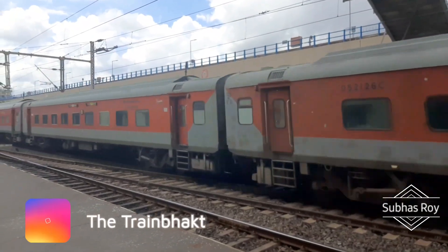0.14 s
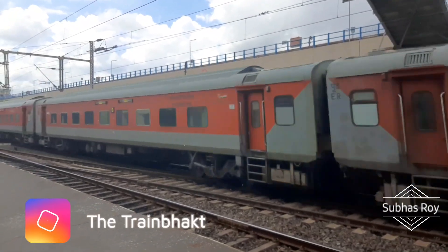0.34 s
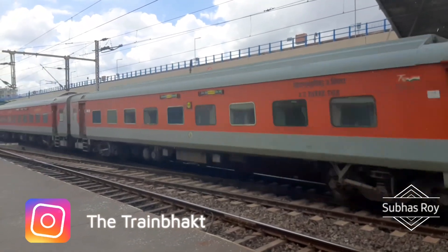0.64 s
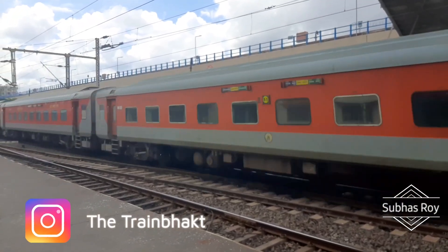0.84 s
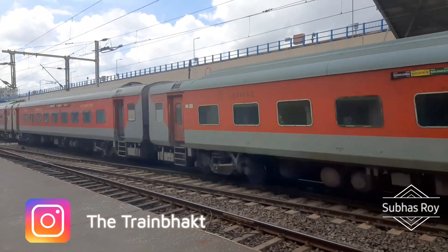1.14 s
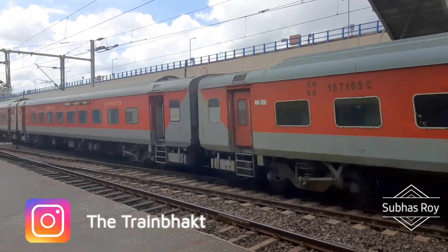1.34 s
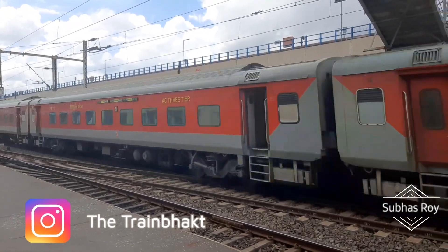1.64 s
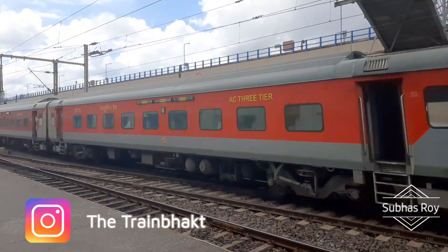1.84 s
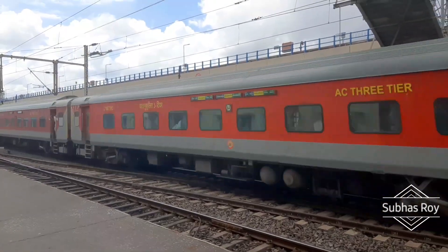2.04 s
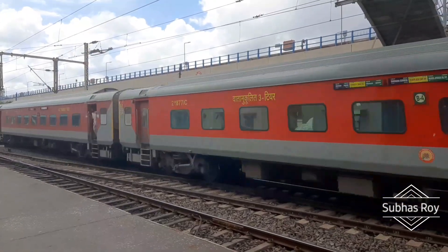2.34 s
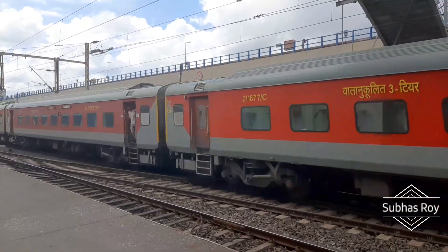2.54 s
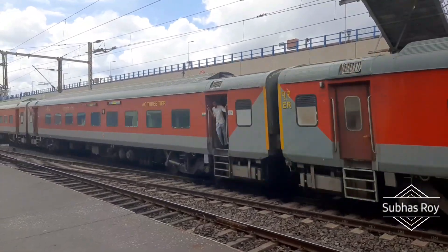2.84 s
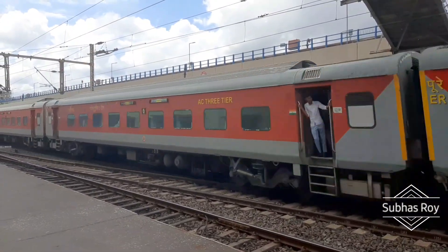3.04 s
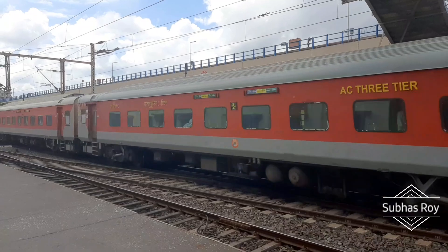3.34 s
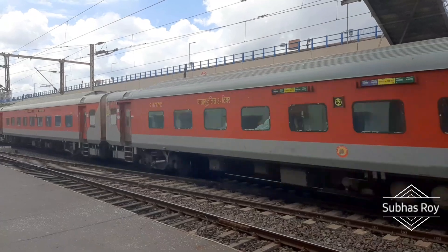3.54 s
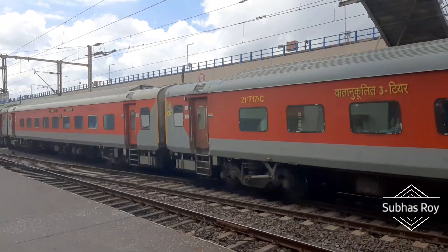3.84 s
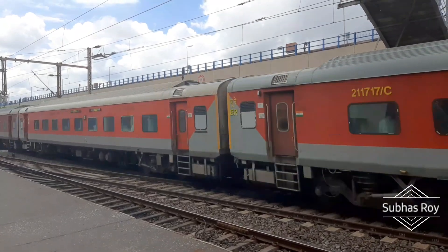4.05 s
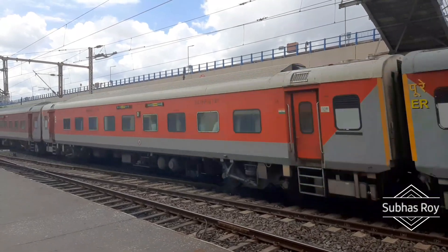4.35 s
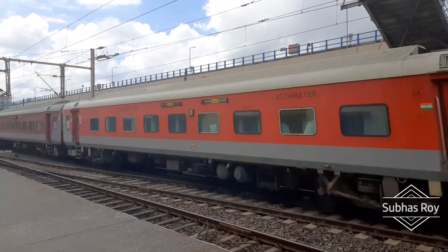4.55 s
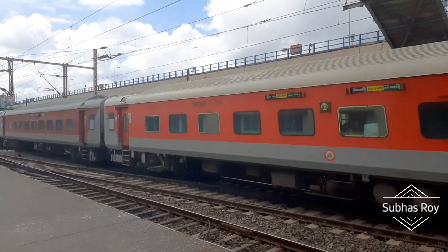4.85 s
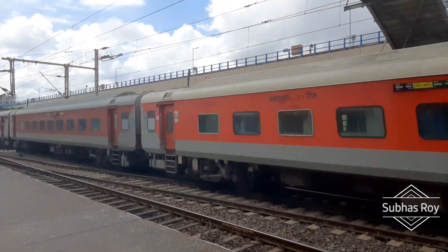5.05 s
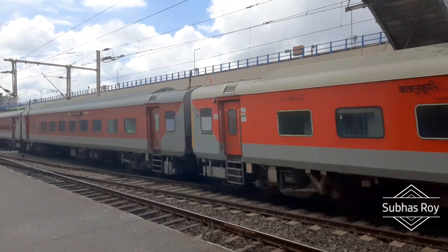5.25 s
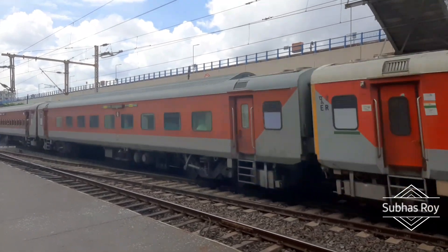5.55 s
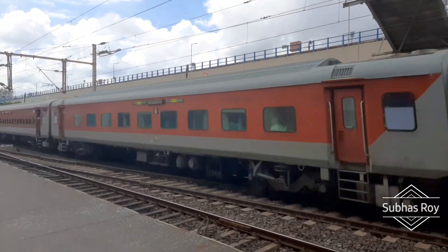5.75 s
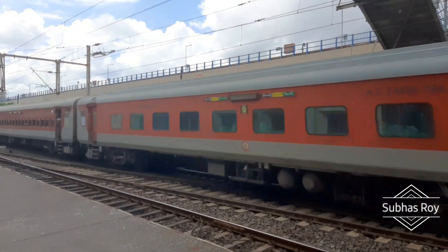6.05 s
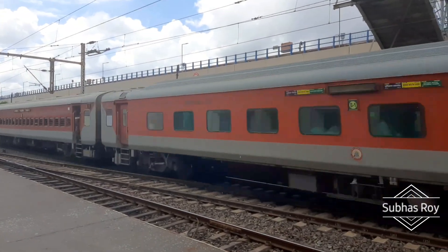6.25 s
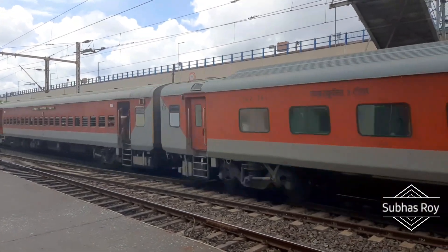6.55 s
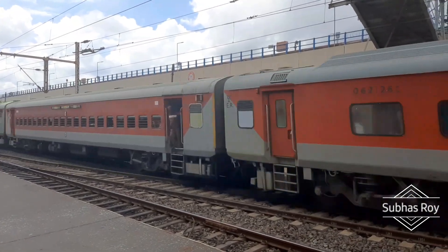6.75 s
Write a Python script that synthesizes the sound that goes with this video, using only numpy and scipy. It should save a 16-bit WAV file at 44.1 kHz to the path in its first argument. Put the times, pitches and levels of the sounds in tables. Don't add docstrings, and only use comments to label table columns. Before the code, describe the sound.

Coach after coach clatters by at moderate speed, steel wheels banging over track gaps, with rumbling rails, faint wheel singing and thin hiss.

```python
import sys
import numpy as np
from scipy import signal
from scipy.fft import rfft, irfft, next_fast_len
from scipy.io import wavfile
from scipy.ndimage import uniform_filter1d, minimum_filter1d, map_coordinates

SR = 44100
rng = np.random.default_rng(int(sys.argv[2]) if len(sys.argv) > 2 else 0)


def boost(x):
    u = np.asarray(x, float) / 20
    return 10 ** u


def unload_audio(sound):
    columns = np.transpose(np.atleast_2d(sound))
    steps = np.round(np.clip(columns, -1, 1) * 32767)
    wavfile.write(sys.argv[1], SR, steps.astype(np.int16))


N = 303849

SPEED_M_S, SLOWING_M_S2 = 18.9, 0.16
WHEELBASE_M, STRETCH_M = 2.56, 3.8


def along(points, hz):
    f, v = np.transpose(points)
    return np.interp(np.log(hz + 1), np.log(f + 1), v)


def curves(rows):
    s, *columns = np.transpose(rows)
    return [np.interp(np.arange(N) / SR, s, column) for column in columns]


def unit(x):
    return x / np.sqrt(np.mean(x ** 2) + 1e-20)


def wobble(rate, count=N):
    knots = rng.standard_normal(int(count * 100 / SR) + 4)
    return map_coordinates(knots, [np.arange(count) * min(rate, 99) / SR])


def filtered(x, response):
    m = next_fast_len(N + SR // 2)
    return irfft(rfft(x, m) * response(np.fft.rfftfreq(m, 1 / SR)), m)[..., :N]


def modes(table):
    def response(f):
        total = 0
        for k, (centre, width, db) in enumerate(table):
            damping = 1j * f * width
            total = total + (-1) ** k * boost(db) * damping / (centre * centre - f * f + damping)
        return total
    return response


def colour(spectrum):
    return lambda f: boost(along(spectrum, f))


def rush(patchy_db):
    # frequency in Hz, likeness of left and right (correlation).
    coherence = [(60, 1.2), (130, 1), (290, 0.83), (640, 0.79), (1410, 0.12), (3100, 0.11), (6820, 0.15),
                 (15000, 0.62)]
    z = signal.stft(rng.standard_normal((2, N)), nperseg=512)[2]
    patches = uniform_filter1d(rng.standard_normal(z.shape[1:]), size=2, axis=0)
    patches = uniform_filter1d(patches, size=7, axis=1)
    pair = signal.istft(z * boost(patchy_db * unit(patches)), nperseg=512)[1][:, :N]

    def mid_side(hz):
        angle = np.arccos(np.clip(along(coherence, hz), -1, 1)) / 2
        return np.array([np.cos(angle), np.sin(angle)])

    mid, side = filtered(pair, mid_side)
    return np.array([mid + side, mid - side])


def speed(s):
    return SPEED_M_S - SLOWING_M_S2 * s


def passing(column, rise, fall, alone_db, last_db, after_db, fading_db, floor_db, heave_db):
    # arrival in seconds, then levels in dB of track boom, rail roar, wheel roar and gear hiss.
    bogies = [(-.125, -8.5, -17.5, -26.5, -37.5), (.3606, -11, -20.5, -27.5, -41.5),
              (1.154, -12.5, -21, -27, -42), (1.642, -12, -22, -29, -44.5),
              (2.4435, -12, -20.5, -28.5, -47), (2.943, -11, -20, -25, -43), (3.7485, -11, -19, -25, -42),
              (4.249, -13, -20, -26.5, -40), (5.0734, -13.5, -21.5, -26, -35),
              (5.5814, -11.5, -20.5, -28, -43.5), (6.415, -13.5, -21.5, -27, -40.5)]
    # distance in m, length in seconds, dB over the
    swells = [
        (4.25, 0.011, -2),
        (9.1, 0.03, -8.5),
        (11.6, 0.029, -9),
        (14.1, .035, -10),
    ]
    shield_db = -2
    t, power = np.arange(0, N, 64) / SR, boost(2 * floor_db)

    def step(u, width):
        return 1 / (1 + np.exp(-np.clip(4 * u / abs(width), -50, 50)))

    for k, row in enumerate(bogies):
        u, pace = t - row[0], speed(row[0])
        axle_gap_s = WHEELBASE_M / pace
        left = u - (WHEELBASE_M + STRETCH_M) / pace
        first_axle = boost(2 * alone_db) * np.clip(u / abs(rise), 0, 1) ** 2
        on = first_axle + (1 - boost(2 * min(alone_db, 0))) * step(u - axle_gap_s, rise)
        on = on * boost(2 * last_db * step(left + axle_gap_s / 2, axle_gap_s))
        glow_db = after_db + shield_db * (1 - k % 2) - fading_db * np.maximum(left, 0)
        off = 1 - step(left, fall) * (1 - boost(2 * glow_db))
        heave = sum(boost(2 * (db + heave_db)) * np.exp(-((u - m / pace) / length) ** 2)
                    for m, length, db in swells)
        power = power + boost(2 * row[column]) * (on * (u > 0) * off + heave)
    return np.interp(np.arange(N) / SR, t, 10 * np.log10(power))


def track():
    # resonance in Hz, width in Hz, level in dB; rail on sleepers, upper rail, then ground and coaches.
    sleeper_modes = [(204.4, 21.5, -8.5), (242.3, 18.8, 0.5), (277.6, 21.6, 0), (306, 30.5, -2),
                     (367, 37, -5), (408, 79, -14.5)]
    rail_modes = [(456, 89, -5), (558, 107, -4), (628.7, 36, 1), (708, 99, -3.5), (802.5, 144, -5),
                  (1077, 183, -14), (1247, 200, -14.5)]
    ground_modes = [(81.7, 25, -6), (103.4, 12.5, -1), (135.2, 24.5, -0.5), (164.6, 13.6, -4.5),
                    (178.8, 13.5, -6)]
    # frequency in Hz, level in dB per Hz.
    yard_spectrum = [(25, -4), (50, 3), (75, 11), (110, -5), (160, 2), (260, -16), (500, -36), (900, -44),
                     (2000, -120)]
    # rise and fall in seconds, leading and trailing axle alone in dB, afterglow in dB,
    # its fading in dB per second, floor in dB, heave in dB.
    boom_load = (.06, .1, -1.5, -2.5, -14, 12, -28, -5)
    rail_load = (0.21, 0.08, -0.5, 0.44, -8, 10.5, -30, -10)
    ground_load = (0.2, 0, -2, -1, -15, 40, -26, .5)
    boom_db, rail_db = passing(1, *boom_load), passing(2, *rail_load)
    slow_db = uniform_filter1d(boom_db, size=SR // 8)
    near = np.clip((slow_db + 33.0) / 10, 0, 1)
    jolts = near * wobble(35)
    boom = unit(filtered(boost(0.27 * jolts) * rush(patchy_db=0.5), modes(sleeper_modes)))
    rail_jolts = boost(1.8 * jolts + 1.33 * near * wobble(50))
    rail = unit(filtered(rail_jolts * rush(patchy_db=1.2), modes(rail_modes)))
    shaking = unit(filtered(rush(patchy_db=0.35), modes(ground_modes)))
    ground = boost(passing(1, *ground_load) - 4.5) * shaking
    distant = rng.standard_normal(N) + 0.55 * rng.standard_normal((2, N))
    yard = boost(-27.5) * unit(filtered(distant, colour(yard_spectrum)))
    return boost(boom_db - 2.5) * boom + boost(rail_db) * rail + ground + yard


def contacts():
    # time in seconds, clang in dB, bright share in dB, thump in dB.
    axles = [(-.125, -13, -25, 0), (.017, -12, -12, -8), (.3606, -11, -19, 0), (.4933, -13.5, -26, -1),
             (1.154, -12.5, -23, -1.5), (1.2866, -13, -29, 0.5), (1.642, -12.5, -22, -1.5),
             (1.779, -15.5, -25, -0.5), (2.4435, -10.5, -16, -5), (2.576, -12.5, -39, -1.5),
             (2.943, -13, -30, 2), (3.075, -17, -30, -5.5), (3.7485, -8.5, -30, -0.5),
             (3.893, -12.5, -30, 0.5), (4.249, -10.5, -19, -1), (4.386, -14, -21, -6),
             (5.0734, -9.5, -26, -4.5), (5.215, -12, -11, 0), (5.5814, -11.5, -17, -2),
             (5.723, -14.5, -28, -4), (6.415, -10.5, -20, -4.5), (6.565, -12, -25, 1.5)]
    # distance in m, clang in dB, thump in dB, rattle length in seconds, ping in dB.
    gaps = [
        [(0, 0.3, -4, 0.043, -1.1), (.92, -16, -3, .03, -6), (1.92, -8.5, -0.5, .04, 7),
         (2.9, -12, 0.5, 0.027, -8)],
        [(0, 1.6, -2.5, 0.04, -8), (.95, -16, -1, .04, -8), (1.8, -27, -0.5, 0.045, -8),
         (2.82, -5, 0, 0.067, -10)],
    ]
    # time in seconds, clang in dB, thump in dB, pitch in Hz.
    stray_blows = [(.245, -21, -20, 300), (.3, -20, -20, 290), (0.752, -19.5, -32, 250),
                   (.974, -17.5, -11, 250), (1.37, -14.5, -25, 268), (2.052, -28, -7, 261),
                   (2.098, -38, -30, 263), (2.193, -30, -10, 262), (2.267, -32, -9.5, 273),
                   (2.85, -25, -13, 268), (3.651, -29, -16, 270), (6.081, -24, -30, 260),
                   (.557, -30, -7, 283), (1.257, -16, -2, 293), (1.705, -20.5, -12, 290),
                   (2.155, -23, -20, 270), (2.695, -17, -10, 280), (1.956, -27, -5, 250),
                   (2.673, -22, -8, 290), (3.014, -38, -1.5, 282), (3.871, -12, -3, 289),
                   (4.483, -32, -1, 317), (4.546, -20, -6, 310), (5.1, -24, -7, 289), (5.6, -39, -5, 268),
                   (5.161, -23, -0.5, 272), (5.839, -27, -16, 281), (6.717, -30, -13, 264)]
    bounce_hz, spread_hz, scatter_db = 293, 13.4, -1.3
    sag_hz_per_m = 4.6
    luck = rng.uniform(-1.17, 1, (len(axles), len(gaps[0]), 3))
    rows = []
    for k, (s, clang_db, bright_db, thump_db) in enumerate(axles):
        for (m, gap_db, slam_db, length, ping_db), (a, b, c) in zip(gaps[k % 2], luck[k]):
            hz = bounce_hz - sag_hz_per_m * (m + WHEELBASE_M * (k % 2)) + spread_hz * c
            slam = thump_db + slam_db + scatter_db * b
            blow = clang_db + gap_db + scatter_db * a * (m > 0)
            rows.append((s + m / speed(s), slam, hz, blow, bright_db, length, ping_db))
    for s, clang_db, thump_db, hz in stray_blows:
        rows.append((s, thump_db, hz, clang_db, -26, 0.039, -4))
    return [row for row in rows if 0 <= row[0] < N / SR]


def blows(hits):
    out, t = np.zeros((4, N + SR)), np.arange(SR // 3) / SR
    for s, _, _, db, bright_db, length, ping_db in hits:
        held = (1 - np.exp(-t / 0.0024)) / (1 + (t / max(length, 0.005)) ** 4)
        tail = boost(-7.0 - 60 * t / 0.22) * (1 - np.exp(-t / 0.0046))
        shape = held + tail
        ping = boost(ping_db) * (1 - np.exp(-t / 0.0022)) / (1 + (t / 0.014) ** 4)
        tyre = (t / 0.03) ** 2 * np.exp(2 - 2 * t / 0.029)
        parts = np.array([shape, boost(bright_db) * shape, ping, tyre])
        out[:, round(s * SR):][:, :len(t)] += (boost(db - 12.0) * parts) ** 2
    return np.sqrt(out[:, :N])


def wheels(hits):
    # resonance in Hz, width in Hz, level in dB.
    disc_modes = [(1642, 115, 1), (1848, 51, 4.5), (2370, 130, 3.5), (2863, 160, -1), (3515, 215, 0),
                  (4030, 112, 1), (4350, 83, -6), (6460, 17, -7), (6700, 23, -11.5)]
    # frequency in Hz, level in dB per Hz.
    roar_spectrum = [(590, -52), (1000, -5), (1270, -4.5), (1430, -14.5), (1870, -3), (2370, -6.5),
                     (3180, -11), (4080, -11), (5150, -15), (6910, -16), (8400, -28.5), (10900, -82),
                     (18500, -120)]
    clang_spectrum = [(290, -14), (500, 3), (641, 4.5), (811, 1), (1300, -5.5), (2610, -7.5), (2840, -7),
                      (4240, -14), (8400, -19.5), (10900, -79), (18500, -120)]
    hiss_spectrum = [(4710, -4), (8000, 2), (8700, -15), (9710, -1), (12300, 1), (15700, -12)]
    # rise and fall in seconds, leading and trailing axle alone in dB, afterglow in dB,
    # its fading in dB per second, floor in dB, heave in dB.
    roar_load = (0.36, .06, -9, -0.37, -3.5, 21, -39, -24)
    hiss_load = (-0.05, 0.08, -7, 0.4, -1.5, 35, -62, -12)
    ping_modes = modes([(3430, 470, -5.0), (4020, 530, 3.5), (4530, 600, -2.0)])
    tyre_modes = modes([(2400, 290, 0), (2710, 120, -12.5)])
    roar_db, hiss_db = passing(3, *roar_load), passing(4, *hiss_load)
    dull, bright, ping, tyre = blows(hits)
    rattle = boost(1.6 * wobble(45))
    roar = boost(roar_db) * rattle * unit(filtered(rush(patchy_db=4.0), colour(roar_spectrum)))
    clang = dull * unit(filtered(rush(patchy_db=2.4), colour(clang_spectrum)))
    clang += boost(-4.0) * ping * unit(filtered(rush(patchy_db=2.5), ping_modes))
    clang += boost(-7.5) * tyre * unit(filtered(rush(patchy_db=-0.5), tyre_modes))
    drive = np.hypot(boost(roar_db), 0.49 * dull) * rush(patchy_db=1)
    ring = sum(filtered(boost(2.7 * wobble(16)) * drive, modes([mode])) for mode in disc_modes)
    hiss_level = np.hypot(boost(hiss_db + 3.0), 0.99 * bright) * boost(1.3 * wobble(22.07))
    hiss = hiss_level * unit(filtered(rush(patchy_db=6.0), colour(hiss_spectrum)))
    return roar + clang + boost(8) * ring, hiss


def thumps(hits):
    out, t = np.zeros(N + SR), np.arange(SR // 10) / SR

    def swell(rise):
        return t / rise * np.exp(1 - t / rise)

    for (s, db, hz, *_), (turn, bend) in zip(hits, rng.random((120, 2))):
        bounce = swell(0.0069) * np.sin(2 * np.pi * (hz * t + turn))
        knock = boost(-10) * swell(0.0076) * np.sin(2 * np.pi * ((345 + 120 * bend) * t + bend))
        out[max(round((s - 0.004) * SR), 0):][:len(t)] += boost(db - 7.5) * (bounce + knock)
    return out[:N] * np.ones((2, 1))


def songs():
    # start in seconds, length in seconds, first pitch in Hz, level in dB.
    singing = [(.45, 0.44, 3660, -54), (1.153, 0.043, 3450, -29), (4.63, 0.21, 3660, -38),
               (1.343, 0.13, 1950, -40), (1.486, 0.27, 2965, -38), (1.648, 0.87, 2400, -41),
               (1.996, 0.2, 4000, -42), (2.051, 0.26, 4600, -50), (2.455, 0.048, 2370, -26),
               (2.55, 0.043, 2375, -26), (2.856, 0.032, 1330, -28), (2.948, 0.47, 2385, -37),
               (3.25, 0.2, 3570, -36), (3.75, 0.48, 3600, -37), (3.75, 0.42, 2410, -43),
               (3.93, 0.14, 1675, -34), (4.1, 0.26, 4620, -41), (4.6, .38, 1825, -39),
               (4.72, 0.24, 3390, -43), (5.59, 0.081, 1858, -28.5), (5.553, 0.61, 4070, -40),
               (6.0, 0.31, 3520, -39.5), (5.9, .17, 6910, -40), (6.156, 0.56, 2790, -55),
               (6.708, 0.2, 4085, -52), (6.76, 0.19, 3450, -39)]
    sink_per_s = 0.04
    out = np.zeros((2, N + SR))
    for s, length, first_hz, db in singing:
        u = np.linspace(0, 1, round(length * SR))
        slow = [wobble(rate, count=SR)[:len(u)] for rate in (56, 30, 30)]
        hz = first_hz * (1 - sink_per_s * length * u) + 6 * slow[0]
        phase = 2 * np.pi * np.cumsum(hz) / SR
        flutter = boost(db + 1.8 * np.array(slow[1:]))
        envelope = np.sqrt(np.sin(np.pi * u) + 1e-9)
        out[:, round(s * SR):][:, :len(u)] += flutter * envelope * np.sin(phase + [[0], [1.3]])
    return out[:, :N]


def hums():
    # start in seconds, length in seconds, pitch in Hz, level in dB.
    rail_hums = [
        (0.788, 0.14, 259.4, -21),
        (2.099, 0.16, 262, -23),
        (3.481, 0.18, 253, -18.5),
        (4.661, 0.15, 247, -26.5),
        (5.978, .12, 278, -34),
    ]
    out = np.zeros(N + SR)
    for s, length, hz, db in rail_hums:
        u = np.linspace(0, 1, round(length * SR))
        phase = 2 * np.pi * np.cumsum(hz + 6 * wobble(36, count=SR)[:len(u)]) / SR
        flutter = boost(db + 1.4 * wobble(37, count=SR)[:len(u)])
        out[round(s * SR):][:len(u)] += flutter * np.sqrt(np.sin(np.pi * u) + 1e-9) * np.sin(phase)
    return out[:N]


def scene():
    # time in seconds, left-right difference in dB.
    bearing = [
        (0, 1.5),
        (3.1, 1.5),
        (3.55, 6),
        (3.9, 3.5),
        (4.8, 3.5),
        (5.9, 3.5),
        (6.16, 4.5),
        (6.5, 3.5),
    ]
    # frequency in Hz, left-right difference in dB at the mean bearing.
    tilt = [(40, 0), (130, 2.5), (250, 0.1), (700, 0.82), (2000, 0.26), (4000, -2.5)]
    hits = contacts()
    wheel, hiss = wheels(hits)
    sides = np.array([[0.5], [-0.5]])
    near = track() + thumps(hits) + wheel + songs() + hums()
    near = near * boost(sides * curves(bearing)[0])
    return filtered(near, lambda hz: boost(sides * along(tilt, hz))) + hiss


def thinned(x):
    # frequency in Hz, share of tiles missing (0-1).
    missing = [(7600, 0), (8200, .1), (8700, .25), (9300, .1), (13000, .07), (14500, .2), (15500, .6)]
    hz, t, z = signal.stft(x, SR, nperseg=512)

    def tiles(a):
        return np.repeat(np.repeat(a, 6, axis=0), 5, axis=1)[:len(hz), :len(t)]

    luck, rough = rng.random((2, len(hz) // 6 + 1, len(t) // 5 + 1))
    treble = np.abs(z[:, hz > 9000]).mean(axis=(0, 1))
    loud = np.clip(unit(uniform_filter1d(treble, size=15)), 0.9, 2.5)
    lost = tiles(luck) * loud < along(missing, hz)[:, None]
    gain = np.where(lost, boost(-35), boost(8.5 * tiles(rough) - 7.0))
    return signal.istft(z * np.where(hz[:, None] > 8000, gain, 1), SR, nperseg=512)[1][:, :N]


def band_limit(x):
    return signal.sosfilt(signal.butter(12, 15820, fs=SR, output="sos"), x)


def record(dry):
    x = filtered(thinned(dry), lambda hz: (1j * hz / (1j * hz + 50)) ** 4)
    needed = np.minimum(1, 0.93 / (np.abs(x).max(axis=0) + 1e-9))
    gain = uniform_filter1d(minimum_filter1d(needed, size=SR // 100), size=SR // 100)
    return band_limit(gain * x)


dry = scene()
out = record(dry)
unload_audio(out)
```